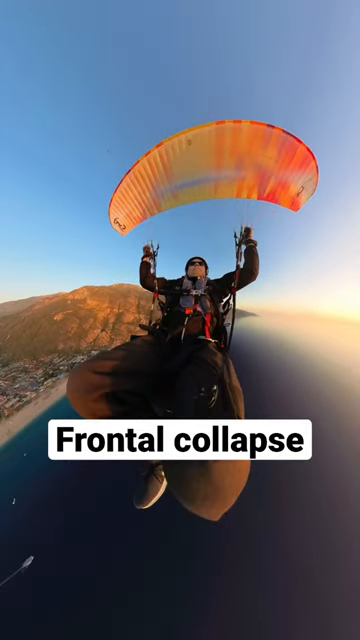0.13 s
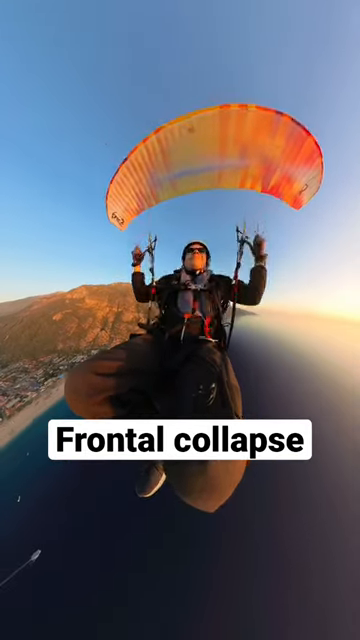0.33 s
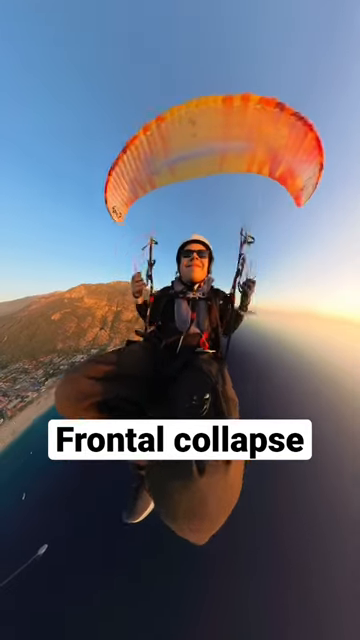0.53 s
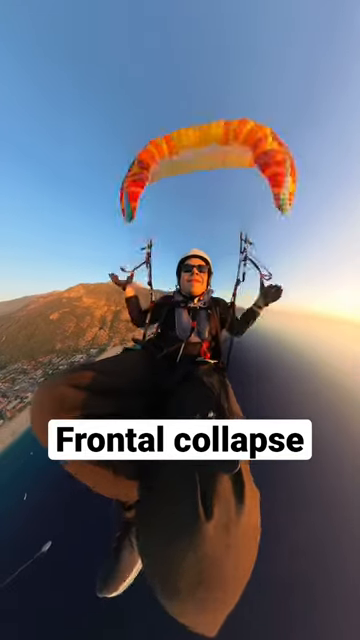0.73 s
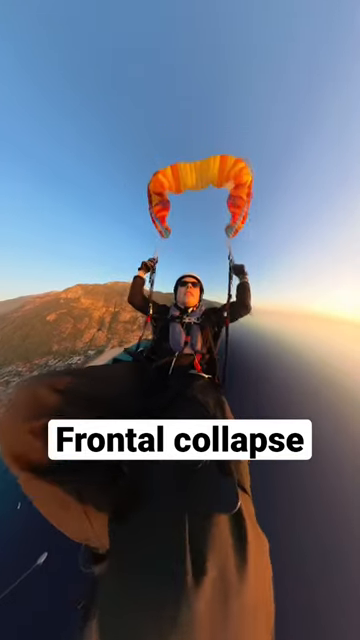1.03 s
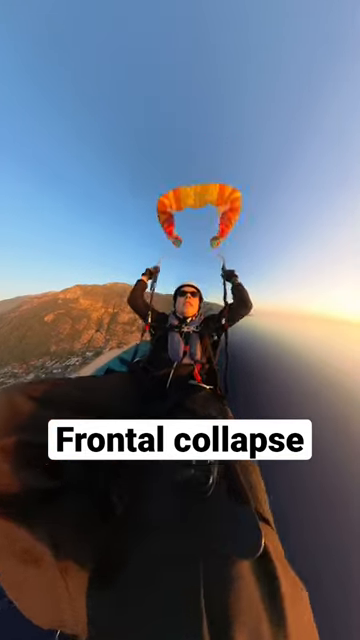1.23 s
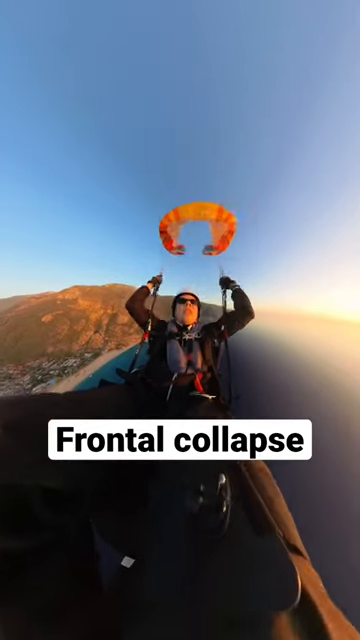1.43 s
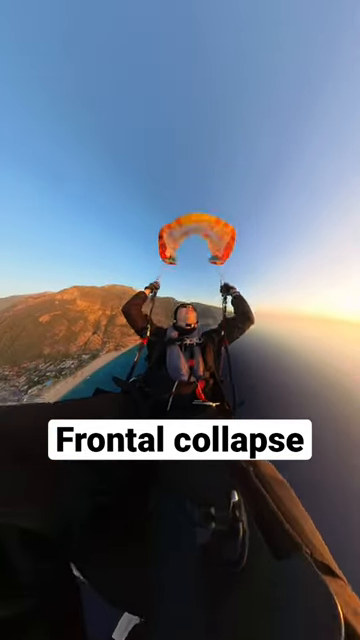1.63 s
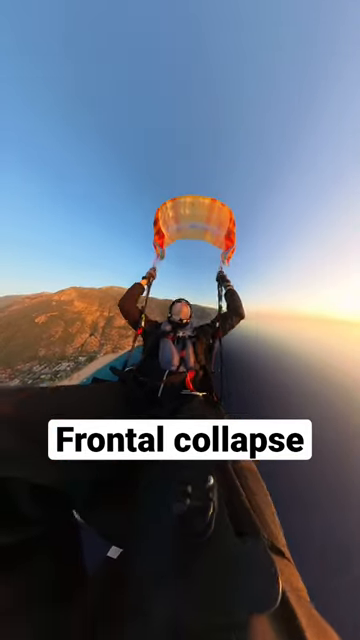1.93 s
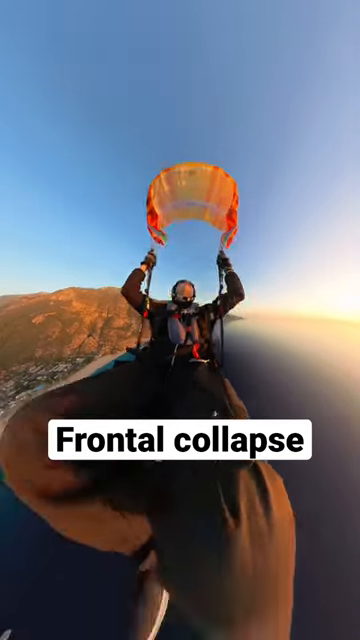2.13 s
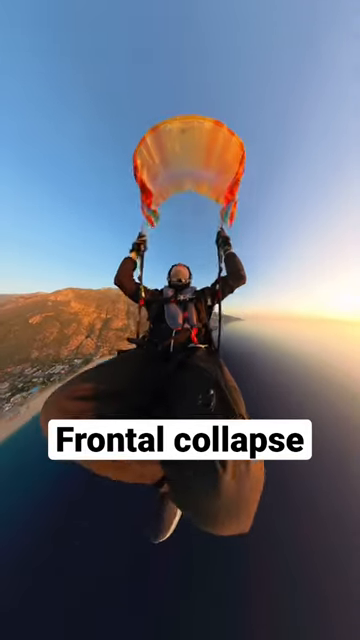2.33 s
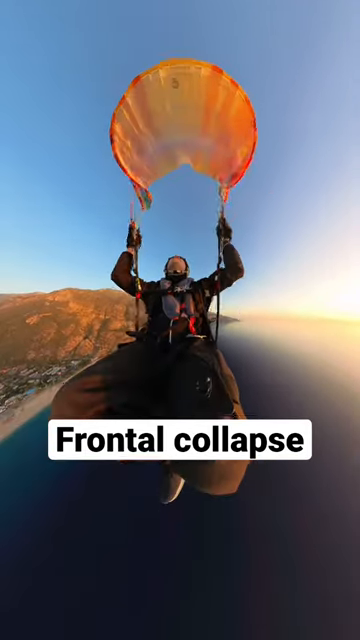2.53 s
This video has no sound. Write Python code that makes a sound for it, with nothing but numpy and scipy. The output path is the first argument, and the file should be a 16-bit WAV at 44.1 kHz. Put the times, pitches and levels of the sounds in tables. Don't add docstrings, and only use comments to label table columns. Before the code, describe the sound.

Close, muffled wind noise high in open air: low rumble and brief throbs first, a sharper crackling burst as the fabric wing collapses, then heavy uneven thumps and thin rustling as it refills.

```python
import sys
import numpy as np
from scipy import signal
from scipy.fft import rfft, irfft, next_fast_len
from scipy.io import wavfile
from scipy.ndimage import uniform_filter1d, minimum_filter1d, map_coordinates

SR = 44100
rng = np.random.default_rng(int(sys.argv[2]) if len(sys.argv) > 2 else 0)


def field_ratio(decibels):
    return 10 ** (np.asarray(decibels, dtype=float) / 20)


def wav_record(signal):
    frames = np.transpose(np.atleast_2d(signal))
    bounded = np.clip(frames, -1, 1)
    quanta = np.round(bounded * 32767).astype(np.int16)
    wavfile.write(sys.argv[1], SR, quanta)


N = 119070


def unit(x):
    return x / np.sqrt(np.mean(x ** 2) + 1e-20)


def curves(rows):
    s, *columns = np.transpose(rows)
    return [np.interp(np.arange(N) / SR, s, column) for column in columns]


def wobble(rate):
    knots = rng.standard_normal(1000)
    return map_coordinates(knots, [np.arange(N) * rate / SR % 990])


def coloured(x, points):
    size = next_fast_len(N + 8192)
    hz = np.fft.rfftfreq(size, 1 / SR)
    point_hz, db = np.transpose(points)
    gain = field_ratio(np.interp(np.log(hz + 1), np.log(point_hz + 1), db))
    return irfft(rfft(x, size) * gain, size)[:N]


def pushes(s, width_s, gain, size, smooth=False):
    at = np.round(s * SR).astype(int)[:, None] + np.arange(-size, size)
    u = (at / SR - s[:, None]) / width_s[:, None]
    shape = u * np.exp(-u * u / 2) if smooth else u / (1 + u * u) ** 2
    shape = shape * np.hanning(2 * size) * (gain / np.sqrt(width_s * SR))[:, None]
    return np.bincount((at + size).ravel(), shape.ravel(), N + 3 * size)[size:N + size]


def eddies(shrink, count, width_s, spread, size_db, size, smooth=False):
    s = (np.arange(count) + rng.random(count)) / count * (N - 1) / SR
    draw = rng.standard_normal((count, 3))
    width = width_s * np.exp(spread * np.clip(draw[:, 0], -1, 2)) * shrink[(s * SR).astype(int)]
    gain = np.sign(draw[:, 1]) * field_ratio(size_db * draw[:, 2])
    return unit(pushes(s, width, gain, size, smooth))


def swells(s, db, length_s):
    t = np.abs(np.arange(N) / SR - s[:, None]) / np.abs(length_s)[:, None]
    return (field_ratio(2 * db)[:, None] * np.exp(-(1.93 * t) ** 2)).sum(0)


# pitch in Hz, level in dB.
PORT_RESPONSE = [(20, -14.5), (45, -3), (90, -1.5), (155, 4), (260, 3), (600, -5), (1500, -16), (6000, -25)]


def through_port(x):
    return coloured(x, PORT_RESPONSE)


# time in seconds, large eddies in dB, small eddies in dB,
# size of the large ones (1 is usual).
AIRFLOW = [(0.02, -16.5, -36, 1.44), (0.21, -25.5, -40, 1.07), (0.27, -23, -28, 0.84),
           (0.4, -26, -58.5, 0.65), (0.66, -25, -44.5, 0.67), (0.79, -21.5, -21.5, 0.99),
           (0.97, -22.5, -15.5, 0.9), (1.03, -22, -19.5, 0.77), (1.15, -30, -17, 0.82),
           (1.36, -27.5, -55, 1.18), (1.65, -27.5, -34, 0.89), (1.8, -20.5, -35, 0.65),
           (2.01, -26.5, -52, 0.97), (2.13, -65, -22.5, 0.77), (2.23, -45, -34, 0.78),
           (2.44, -24, -31.5, 0.85), (2.62, -20.5, -40.5, 0.55), (2.7, -24.5, -15.5, 1.1)]
# centre in seconds, small eddies in dB, large eddies in dB, length in seconds.
GUST_SWELLS = [(0.017, -40, -26, 0.011), (0.315, -29.5, -36.5, 0.038), (0.368, -18, -38, 0.009),
               (0.388, -20, -12, 0.051), (0.574, -34, -25, 0.024), (0.691, -22.5, -7.5, 0.035),
               (0.81, -14, -34, 0.0085), (0.895, -13, -33, 0.0096), (1.018, -37.5, -28, 0.09),
               (1.133, -22, -16.5, 0.026), (1.17, -31.5, -45, 0.0074), (1.341, -18, -8.5, 0.018),
               (1.408, -20, -10.5, 0.0074), (1.443, -42.5, -22, 0.02), (1.508, -12.5, -17.5, 0.012),
               (1.57, -36.5, -12, 0.022), (1.609, -21, -8, 0.012), (1.662, -6, -9.5, 0.003),
               (1.775, -32.5, -27, 0.0073), (1.87, -22.5, -37, 0.087), (1.958, -21, -19, 0.06),
               (2.026, -17.5, -13.5, 0.01), (2.156, -30, -19, 0.11), (2.322, -32.5, -17.5, 0.013),
               (2.462, -23, -6.5, 0.0083), (2.502, -31.5, -5, 0.004), (2.594, -15.5, -32, 0.065),
               (2.687, -20.5, -24, 0.027), (0.15, -39.5, -16, .03), (0.257, -34, -19, 0.013),
               (1.299, -34, -31, .015), (1.797, -31, -16.5, 0.01), (2.152, -30.5, -10, 0.018),
               (2.262, -34, -16.5, 0.012)]
# pitch in Hz, level in dB.
LARGE_EDDY_TONE = [(40, 3.5), (75, -2), (115, -2), (155, -0.5), (210, -2.5), (400, 2), (1000, 4),
                   (3000, -53)]
# pitch in Hz, level in dB.
HAZE_TONE = [(300, -6), (600, 2.5), (1200, -15), (2000, -24.5), (3500, -36.5), (6000, -59.5)]


def wind():
    large_db, small_db, scale = curves(AIRFLOW)
    s, small_gust_db, large_gust_db, length = np.transpose(GUST_SWELLS)
    large = np.sqrt(field_ratio(2 * large_db) + swells(s, large_gust_db - 7.5, 1.44 * length))
    small = np.sqrt(field_ratio(2 * small_db) + swells(s, small_gust_db + 1, length))
    small = small * field_ratio(2.2 * wobble(110))

    sharpen_per_db, sharpen_from_db = 0.012, -25
    shrink = np.exp(-sharpen_per_db * (20 * np.log10(small) - sharpen_from_db))
    large_stream = eddies(np.clip(scale, 0.3, 3), count=1100, width_s=0.0019, spread=0.26, size_db=3, size=512)
    rumble = unit(through_port(coloured(large_stream, LARGE_EDDY_TONE)))
    haze_level = field_ratio(-27 + 1.6 * wobble(60))
    rumble = rumble + haze_level * unit(coloured(rng.standard_normal(N), HAZE_TONE))
    rumble = rumble * large * field_ratio(2.34 * wobble(35.31))

    flutter = eddies(shrink, count=1900, width_s=0.00029, spread=0.33, size_db=3.5, size=128, smooth=True)
    return rumble + through_port(flutter * small * field_ratio(-4.5))


# time in seconds, peak in dB, width in milliseconds.
BIG_EDDIES = [(0.042, -8.5, 1.12), (0.326, -8, 3.2), (0.37, -19, 0.6), (0.694, -23, 0.78),
              (0.792, -8.5, 2.3), (0.803, -11, 2.4), (0.813, -14.5, 1.4), (1.06, -9, 1.2), (1.112, -8, 2.7),
              (1.327, -16, 0.89), (1.34, -8, 0.67), (1.261, -15, 1.1), (1.475, -10.5, 1.1),
              (1.662, -4.5, 1.86), (1.918, -6.5, 1.1), (1.978, -6.5, 2.1), (1.995, -13.5, 1.2),
              (2.141, -15, 0.47), (2.309, -8, 0.9), (2.464, -4.5, 0.59), (2.525, -8.5, 0.69),
              (2.576, -9.5, .8)]


def thumps():
    s, db, width_ms = np.transpose(BIG_EDDIES)
    opening_pa, opening_s = -0.26, 0.0021
    opening = opening_pa * np.exp(-(np.arange(N) / SR / opening_s) ** 2)
    width = np.clip(width_ms, 0.55, 2) / 1000
    return through_port(pushes(s, width, -field_ratio(db + 24.5), size=512)) + opening


# time in seconds, peak in dB, width in milliseconds.
MIDDLE_EDDIES = [(0.0424, -22.5, 0.45), (0.3665, -9.5, 0.32), (0.3802, -15, 0.28), (0.389, -9, 0.34),
                 (0.3962, -15.5, 0.33), (0.4088, -18.5, 0.46), (0.5656, -19.5, 0.57), (0.6549, -19.5, 0.52),
                 (0.6707, -21, 0.53), (0.6829, -14.5, 0.56), (0.6926, -13, 0.45), (0.7027, -14.5, 0.37),
                 (0.7497, -13, 0.5), (0.7889, -17, 0.65), (0.8011, -15, 0.27), (0.8102, -16, 0.36),
                 (0.8267, -13, 0.25), (0.9056, -11.5, 0.29), (0.9587, -13, 0.25), (1.0481, -15, 0.29),
                 (1.0575, -14, 0.47), (1.1818, -16, 0.27), (1.3332, -17.5, 0.36), (1.3435, -17, 0.22),
                 (1.3991, -17, 0.37), (1.4068, -11.5, 0.35), (1.5115, -28, 0.48), (1.5198, -23.5, 0.38),
                 (1.6536, -13.5, 0.33), (1.6745, -15.5, 0.39), (1.7461, -19.5, 0.36), (1.7944, -16, 0.57),
                 (1.8328, -21, 0.4), (1.8552, -16, 0.43), (1.8692, -20, 0.26), (1.8904, -13.5, 0.45),
                 (1.9126, -11, 0.25), (1.9245, -12, 0.35), (1.9336, -14, 0.64), (1.9459, -22, 0.32),
                 (1.9545, -17.5, 0.31), (1.9754, -18, 0.36), (2.0134, -17, 0.31), (2.0205, -12.5, 0.42),
                 (2.1131, -13.5, 0.45), (2.1376, -22.5, 0.27), (2.1645, -15.5, 0.4), (2.4637, -11, 0.38),
                 (2.4958, -20, 0.35), (2.5041, -15.5, 0.57), (2.5256, -16, 0.41), (2.5508, -14, 0.33),
                 (2.565, -17, 0.31), (2.5777, -13.5, 0.28), (2.5862, -8.5, 0.45), (2.6011, -21, 0.42),
                 (2.6114, -13.5, 0.3), (2.6198, -21, 0.39), (2.661, -17, 0.33), (2.682, -11.5, 0.32)]


def pops():
    s, db, width_ms = np.transpose(MIDDLE_EDDIES)
    draw = rng.standard_normal((len(s), 2))
    width = np.clip(width_ms, 0.15, 0.5) / 1000
    gain = field_ratio(db - 1.5) * np.sqrt(width * SR) / np.exp(-0.5)
    late = s + 6.16 * width * np.exp(0.23 * draw[:, 0])
    trail_gain = gain * field_ratio(-7 + 2.0 * draw[:, 1])
    first = pushes(s, width, gain, size=128, smooth=True)
    return first + pushes(late, width, trail_gain, size=128, smooth=True)


# centre in seconds, level in dB, length in seconds, pace in Hz.
EVEN_SHEDDING = [
    (0.166, -20.5, 0.041, 150.3),
    (0.63, -21, 0.068, 160.2),
    (0.768, -20, 0.05, 104.9),
]


def shedding():
    s, db, length, pace_hz = np.transpose(EVEN_SHEDDING)
    turn = 2 * np.pi * np.cumsum(1 + 0.06 * wobble(30)) / SR
    throb = np.zeros(N)
    for k in range(len(s)):
        strength = np.sqrt(2 * swells(s[[k]], db[[k]], length[[k]]))
        throb += strength * np.sin(pace_hz[k] * turn)
    return throb


# time in seconds, peak in dB, width in milliseconds.
TINY_BURSTS = [(0.3781, -33.5, 0.16), (0.3873, -49, 0.066), (0.802, -48, 0.081), (0.799, -34, 0.075),
               (0.8258, -23.5, 0.096), (0.8806, -37, 0.13), (0.8855, -34, 0.14), (0.896, -34, 0.11),
               (0.904, -33, 0.097), (0.927, -24, 0.14), (0.94, -32, 0.15), (0.954, -25.5, 0.17),
               (0.9944, -32, 0.064), (1.009, -23, 0.12), (1.0204, -24, 0.11), (1.0446, -23, 0.2),
               (1.057, -34, 0.09), (1.0744, -32, 0.091), (1.0909, -21, 0.2), (1.102, -20.5, 0.14),
               (1.1087, -23.5, 0.11), (1.132, -19.5, 0.15), (1.1458, -26, 0.12), (1.1813, -17.5, 0.27),
               (1.333, -34, 0.098), (1.341, -40, 0.16), (1.4052, -28, 0.14), (1.6593, -24.5, 0.13),
               (2.68, -33, 0.14), (2.6914, -34, 0.14), (0.702, -30, 0.2), (0.809, -30, 0.12),
               (0.851, -30.5, 0.19), (1.213, -43, 0.2), (1.914, -36, .17), (2.557, -32, .15),
               (2.602, -36, 0.12)]


def snaps():
    s, db, width_ms = np.transpose(TINY_BURSTS)
    draw = rng.standard_normal((len(s), 6, 3))
    when = s[:, None] + 0.0011 * (1 + draw[..., 0])
    width = np.clip(width_ms, 0.085, 0.3)[:, None] / 1000 * np.exp(0.4 * np.abs(draw[..., 1]))
    gain = np.sign(draw[..., 2]) * field_ratio(db + 29)[:, None]
    return pushes(when.ravel(), width.ravel(), gain.ravel(), size=64)


# pitch in Hz, level in dB.
FINE_EDDY_TONE = [(500, -4), (1500, 0), (3000, 0), (5000, -5), (8000, -16)]


def fold():
    t = np.arange(N) / SR
    from_s, to_s, edge_s = 0.875, 1.188, 0.0045
    folded = np.clip(np.minimum(t - from_s, to_s - t) / edge_s, 0, 1)
    fine = eddies(np.ones(N), count=1800, width_s=0.00013, spread=0.3, size_db=4, size=64)
    fine = fine * folded * field_ratio(-31 + 4.2 * wobble(130))
    return coloured(through_port(fine + snaps()), FINE_EDDY_TONE)


# time in seconds, level in dB.
RUSTLE_LEVEL = [(0.02, -77.5), (0.07, -78.5), (0.34, -63.5), (0.42, -69.5), (0.65, -38.5), (0.69, -48),
                (0.78, -55), (0.8, -64), (1.2, -68.5), (1.65, -47), (1.72, -50.5), (1.95, -39.5),
                (2.03, -49), (2.2, -42), (2.34, -48.5), (2.43, -41.5), (2.62, -57), (2.7, -56.5)]
# pitch in Hz, level in dB.
CLOTH_TONE = [(800, 8), (1500, -3.5), (3210, -9.5), (3980, -2.5), (5940, -10.5), (9780, -1), (13000, -9.5),
              (15600, -25)]
# time in seconds, dB over the rustle, length in seconds.
CLOTH_CRACKS = [
    (0.604, 3, 0.006),
    (0.642, -7.5, 0.012),
    (0.777, 4, 0.025),
    (1.96, 8, 0.0076),
    (2.209, 4, 0.011),
    (2.431, 5.5, 0.03),
]


def wing():
    level_db, = curves(RUSTLE_LEVEL)
    crackle = rng.standard_normal(N) * field_ratio(1.1 * wobble(300) + 1.7 * wobble(28.4))
    spectrum = signal.stft(crackle, nperseg=512)[2]
    patches = uniform_filter1d(rng.standard_normal(spectrum.shape), 4, 0)
    patches = unit(uniform_filter1d(patches, 5, 1))
    patchy = signal.istft(spectrum * field_ratio(1.8 * patches), nperseg=512)[1][:N]
    s, db, length = np.transpose(CLOTH_CRACKS)
    return unit(coloured(patchy, CLOTH_TONE)) * field_ratio(level_db + 1.5) * np.sqrt(2 + swells(s, db, length))


# pitch in Hz, level in dB.
HISS_TONE = [(1500, -23), (3000, 1), (4500, 0), (6500, -13.5), (11000, 15.5), (13000, -7.5), (14500, -31)]


def air():
    return field_ratio(-72.5 + 0.5 * wobble(18)) * unit(coloured(rng.standard_normal(N), HISS_TONE))


def scene():
    on_port = wind() + fold() + thumps() + pops() + shedding()
    return (on_port + wing() + air())[None]


def top_cut(x):
    return signal.sosfilt(signal.butter(12, 15630, fs=SR, output="sos"), x)


def record(dry):
    limit, span = 0.5, round(0.006 * SR)
    need = np.minimum(1, limit / (np.abs(dry) + 1e-9))
    gain = minimum_filter1d(need, size=2 * span)
    gain = uniform_filter1d(uniform_filter1d(gain, size=span), size=span)
    return top_cut(dry * gain)


dry = scene()
out = record(dry)
wav_record(out)
```